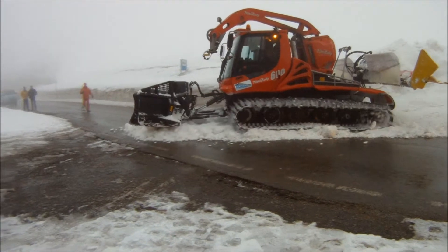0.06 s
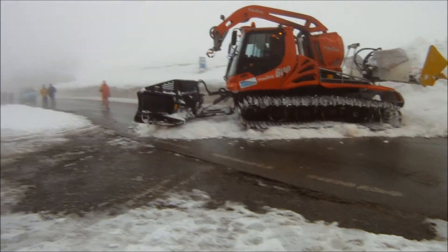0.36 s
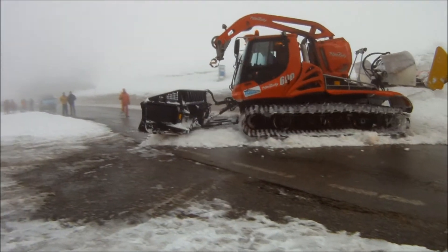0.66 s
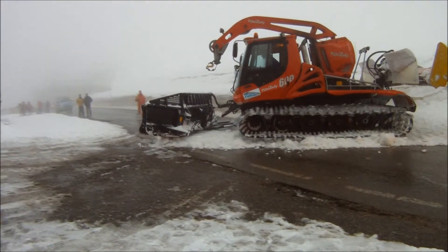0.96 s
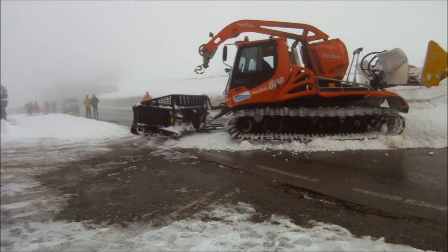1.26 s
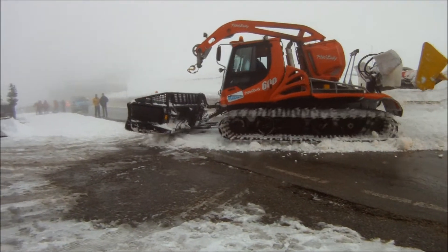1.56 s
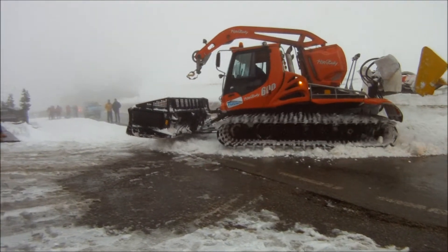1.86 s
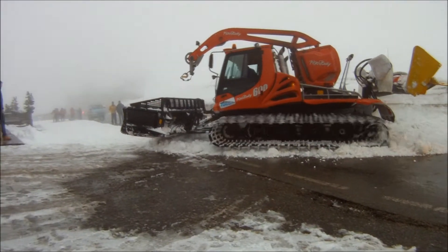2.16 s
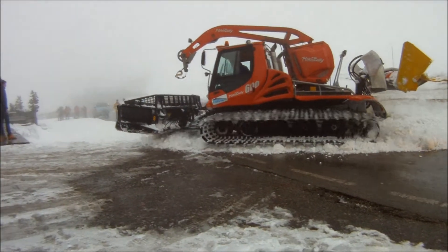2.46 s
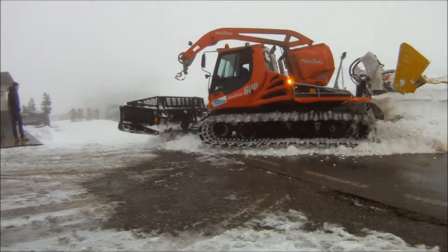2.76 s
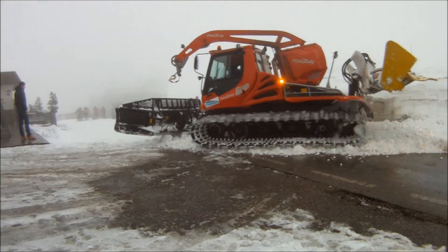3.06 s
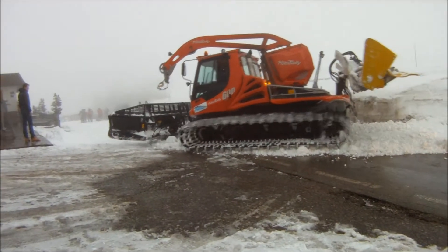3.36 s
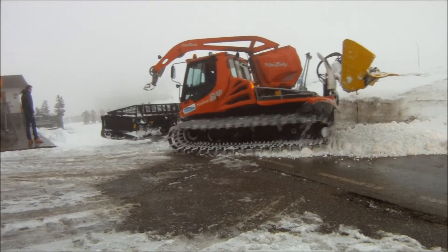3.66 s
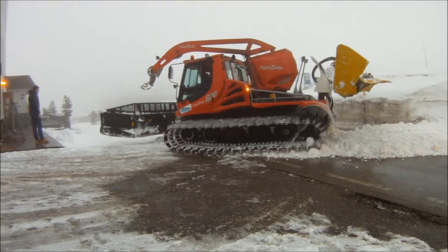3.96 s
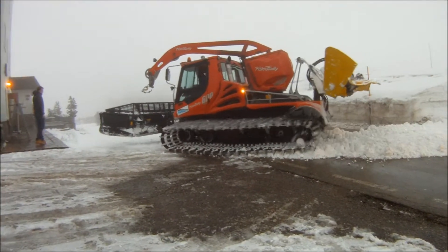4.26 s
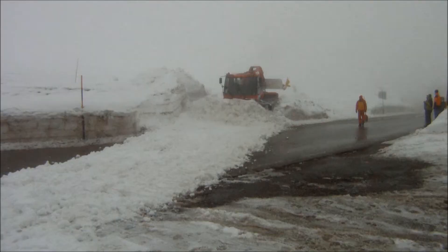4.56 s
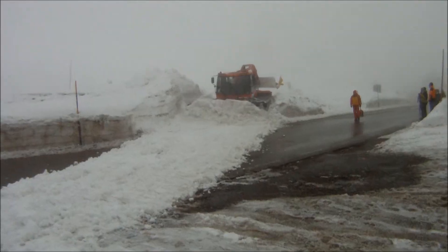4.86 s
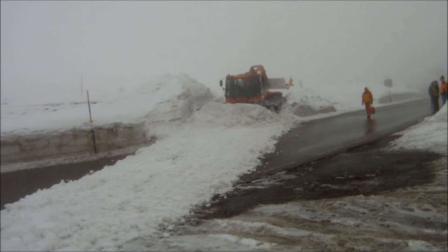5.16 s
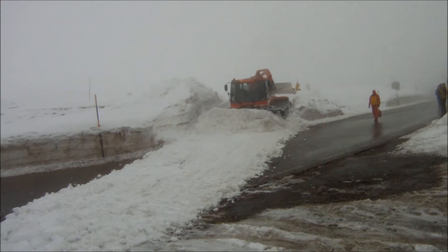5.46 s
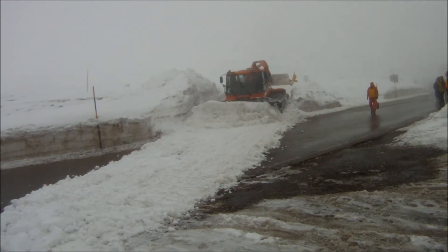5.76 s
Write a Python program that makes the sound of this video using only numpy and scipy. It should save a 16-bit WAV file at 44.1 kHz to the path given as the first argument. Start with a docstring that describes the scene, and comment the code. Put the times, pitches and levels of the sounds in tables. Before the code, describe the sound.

From the start, a tracked snow groomer runs close by, its diesel engine droning and knocking, with clattering panels and an early loose buzz. The tracks crunch steadily through snow, with soft low thumps and a few short, gritty ice cracks. A hydraulic pump whines in swells, most strongly around 1.3 seconds, again near 2.2 and 3.5. The knocking is strongest around 2 seconds, and the tracks rumble harder near 3.5. At about 3.7 seconds the engine throttles back and drops in pitch. At 4.5 seconds the sound breaks off abruptly and resumes as a distant engine wash with a faint drone. Wind bumps the microphone with low thuds until nearly 6 seconds. Between 4.9 and 5.4 seconds, five sharp, dry finger taps clack on the microphone's casing, far louder than everything else. The sound is mono, with a glassy treble.

```python
"""On a wet road, a tracked snow groomer crawls past close to the microphone: its six-cylinder diesel
drones and knocks, a hydraulic pump whines, the tracks thump and crunch through snow. It throttles back
and, after a sudden break, is heard from far up the road, while wind bumps the microphone and five sharp
taps hit the camera body. The small camera takes mono at a low sample rate, adding a glassy treble."""
import sys
import numpy as np
from scipy import signal
from scipy.fft import rfft, irfft
from scipy.io import wavfile

SR = 44100
rng = np.random.default_rng(int(sys.argv[2]) if len(sys.argv) > 2 else 0)


def log_audio(samples):
    """Write samples as a 16-bit WAV file to the path given in sys.argv[1]."""
    # one column per channel
    frames = np.atleast_2d(samples).T
    # limit to full scale, then quantise
    limited = np.clip(frames, -1, 1)
    pcm = np.round(limited * 32767).astype(np.int16)
    wavfile.write(sys.argv[1], SR, pcm)


N = 260190
TIME = np.arange(N) / SR
BREAK_S, RESUME_S = 4.546, 4.561   # the close pass ends; the far machine comes in fully


def groomer_near(firings):
    """The machine at close range; firings is the running count of cylinder firings."""
    drone = part_gain("drone") * exhaust(firings, waver_db=1, overtone_waver_db=2)
    return drone + knock(firings) + panels(firings) + tracks() + pump(firings) + fan(firings)

# exhaust orders: multiple of the firing rate, level/dB
EXHAUST_ORDERS = [(1 / 2, -15), (1, 0), (3 / 2, -17), (2, -16.5), (3, -22), (4, -19)]
def exhaust(firings, waver_db, overtone_waver_db):
    """Exhaust pulses drone in low engine orders, strongest at the firing rate."""
    out = 0
    for order, db in EXHAUST_ORDERS:
        waver = drift(3.7) * (waver_db if order == 1 else overtone_waver_db)
        out += from_db(db + waver) * np.sin(2 * np.pi * (order * firings + rng.random()))
    return rms_one(out)

# each cylinder's blow: level on the sump/dB, level on the head/dB
CYLINDER_BLOWS = [(-13, -2), (0, 1), (-7, -3), (-13, 1), (-1, -3), (-5, 0)]
# resonances of the sump and of the cylinder head: f/Hz, width/Hz, level/dB
SUMP_MODES = [(1003, 48, 0), (1075, 70, -14)]
HEAD_MODES = [(2000, 33, 1), (2035, 92, 12), (1970, 65, -36)]
def knock(firings):
    """Combustion rings the sump and the head; valves close between firings and keep the head ringing."""
    on_sump, on_head = np.transpose(CYLINDER_BLOWS)
    sump_blows = blows(firings, on_sump, decay=2, uneven_db=.8, rattle=.35)
    head_blows = blows(firings, on_head, decay=1.2, uneven_db=.8, rattle=.8)
    valves = from_db(-5) * blows(firings + .4, on_head, decay=1.2, uneven_db=.8, rattle=.5)
    sump = resonate(band(sump_blows, 935, 1056), SUMP_MODES)
    head = resonate(band(head_blows + valves, 1853, 2213), HEAD_MODES)
    in_view = from_db(ramp(1.85, .1, 4.25))   # the sump comes out from behind the track
    return part_gain("sump") * in_view * sump + part_gain("head") * head

def blows(firings, cylinder_db, decay, uneven_db, rattle):
    """Each firing is a blow and a dying rattle; every cylinder has its own strength."""
    count = firings.astype(int)
    strength = from_db(cylinder_db[count % len(cylinder_db)] + uneven_db * rng.standard_normal(N)[count])
    blow = rms_one(1. * (np.diff(count, prepend=0) > 0))
    burst = rms_one(np.exp(-decay * (firings % 1)) * rng.standard_normal(N))
    return strength * (blow + rattle * burst)

# resonances of the bodywork and of one loose panel: f/Hz, width/Hz, level/dB
PANEL_MODES = [(1160, 220, -1.5), (1452, 93, 1), (1790, 130, 1.5), (2226, 200, 2.5), (2453, 73, 4.5),
               (3296, 75, 3), (3597, 276, 4), (4290, 180, -3), (4960, 250, -4.5)]
LOOSE_PANEL_MODES = [(1237, 53, 0)]
def panels(firings):
    """The engine shakes the panels into a clatter; a loose one buzzes early in the pass."""
    on_head = np.transpose(CYLINDER_BLOWS)[1]
    shaking = blows(firings, .5 * on_head, decay=.62, uneven_db=1.95, rattle=25)
    clatter = part_gain("clatter") * resonate(band(shaking, 1240, 5340), PANEL_MODES)
    buzz = part_gain("buzz") * resonate(band(shaking, 1080, 1470), LOOSE_PANEL_MODES)
    return clatter + buzz

def engine_speed():
    """Firings per second: cruising, one lug, a run-down, then steady far up the road."""
    cruise_hz, throttled_hz, far_hz = 59.6, 51, 61
    lug = swell(2.08, .48, 2.2)   # heavy snow
    run_down = ramp(3.76, .47, cruise_hz - throttled_hz)   # the driver lifts off
    return np.where(TIME < BREAK_S, cruise_hz - lug - run_down, far_hz)

# throttle shut, blipped, shut, then eased open: t/s, effort/dB
ENGINE_EFFORT = [(3.68, -1), (3.81, -11.5), (3.88, -4.5), (3.98, -11), (4.2, -7.5), (4.4, -2.5)]
# each part from the roadside: base level/dB, share of the effort, swell t/s, half length/s, swell/dB
PASS_BY = { "drone": (-47.3, 1.1, 1.47, 0.8, -3), "sump": (-60, 1.2, 2, 0.43, 4.5),
           "head": (-57.5, 0.86, 1.84, 2.1, 11.2), "clatter": (-56, 0.26, 3, 1, 2),
           "buzz": (-66.5, 1.2, 0.2, 1.4, 10), "crunch": (-52, 0.5, 3, 1.4, 1.5),
           "rumble": (-58.5, 0.04, 2.5, 0.47, 4), "fan": (-66, 1.3, 0.95, 0.5, 6), }
def part_gain(name):
    """A part follows the throttle, and swells or is screened once as it passes the microphone."""
    db, share, s, half_length_s, swell_db = PASS_BY[name]
    effort_db = np.interp(TIME, *np.transpose(ENGINE_EFFORT))
    return from_db(db + share * effort_db + swell(s, half_length_s, swell_db))

# spectra of crunching snow and of track rumble, close by: f/Hz, level/dB
CRUNCH_SPECTRUM = [(200, -11.5), (300, -5), (420, -6), (620, -0.5), (760, -2), (900, 3.5), (1300, -0.5),
                   (1580, -8), (1800, 6.5), (2600, 1.5), (3000, -7), (3700, 1), (4700, -17), (5450, -1),
                   (5950, -46)]
RUMBLE_SPECTRUM = [(15, 4.5), (40, -6.5), (80, 2), (130, 3), (220, 0), (320, -9.5), (500, -9.5)]
def tracks():
    """The tracks crunch through snow and rumble, louder over a patch of rough ground."""
    crunch = part_gain("crunch") * from_db(1.2 * drift(38)) * noise(CRUNCH_SPECTRUM)
    rough_ground_db = swell(3.51, .15, 8.9)
    rumble = part_gain("rumble") * from_db(rough_ground_db + .5 * drift(14)) * noise(RUMBLE_SPECTRUM)
    return crunch + rumble

# strokes of the blade: t/s, half length/s, level above idle/dB
PUMP_STROKES = [(.22, 0.068, 9.5), (.56, 0.11, 7), (1.25, 0.47, 13), (2.152, 0.41, 10), (3.546, 0.17, 10)]
def pump(firings, idle_db=-73.5, cycles_per_firing=8.48):
    """The hydraulic pump, geared to the engine, whines louder each time the blade is worked."""
    load_db = sum(swell(*stroke) for stroke in PUMP_STROKES)
    return from_db(idle_db + load_db) * shaft_tone(cycles_per_firing * firings, waver_db=1.5)

def fan(firings, cycles_per_firing=4.25):
    """The fan, geared to the engine, hums."""
    return part_gain("fan") * shaft_tone(cycles_per_firing * firings, waver_db=3.5)

def shaft_tone(cycles, waver_db):
    """A shaft-driven tone that flutters a little in phase and level."""
    return rms_one(np.sin(2 * np.pi * cycles + .15 * drift(20)) * from_db(waver_db * drift(6.5)))

# ice cracking near the microphone: t/s, level/dB
ICE_CRACKS = [(.597, -48), (1.376, -48), (1.504, -49), (3.65, -43)]
def cleats(t60=.12, grain_db=2.5):
    """Ice breaks under a track cleat in a short gritty burst."""
    envelope, t = np.zeros(N), TIME[:SR // 4]
    for s, db in ICE_CRACKS:
        add(envelope, s, from_db(db - 60 * t / t60))
    grit = band(rng.standard_normal(N), 700, 4300) * from_db(grain_db * drift(300))
    return envelope * resonate(grit, [(1700, 900, -3), (3600, 600, 0), (4400, 500, -6)])

# spectrum of the machine from far up the road: f/Hz, level/dB
FAR_SPECTRUM = [(20, 19), (45, 25), (70, 18), (110, 8.5), (170, 4.5), (300, 1.5), (700, -5), (1100, -1),
                (1450, -6), (1850, 1.5), (2400, -5), (3100, -9.5), (5300, -11.5), (6000, -21)]
def groomer_far(firings, level_db=-52):
    """At a distance the knock blurs into a wash, with a faint drone and a thin turbo hiss."""
    wash = noise(FAR_SPECTRUM)
    drone = from_db(-5) * exhaust(firings, waver_db=5, overtone_waver_db=3.5)
    turbo = from_db(-20 + 1.5 * drift(18)) * resonate(rng.standard_normal(N), [(3430, 220, 0)])
    return from_db(level_db) * (wash + drone + turbo)

# taps on the camera, right at the microphone:
# t/s, clack peak/dB, contact brightness/Hz, pitch factor, ring relative to clack/dB, jolt f/Hz
CAMERA_TAPS = [(4.8877, -15.5, 2200, 0.99, -11.5, 50), (4.89, -24, 600, 0.83, -17, 50),
               (5.0563, -5, 2160, 0.95, -51, 178), (5.0929, -1, 4950, 1.002, -38, 121),
               (5.1842, -1, 4970, 0.967, -23.5, 80), (5.222, -45, 1990, 0.85, -24, 80),
               (5.311, -41.5, 1200, 0.69, -10, 80), (5.3401, -2, 6000, 1.004, -23.5, 107)]
def taps(ring_hz=960, ring_t60=.029, grit_t60=.018, jolt_db=-31.5, jolt_lead_s=.0018):
    """A finger's gritty push gives a dry clack, a hollow ring and a dull thud through the grip."""
    out, t = np.zeros(N), TIME[:SR // 15]
    for s, db, contact_hz, pitch, ring_db, jolt_hz in CAMERA_TAPS:
        push = 2 * np.pi * contact_hz / SR * np.exp(-2 * np.pi * contact_hz * t)
        grit = from_db(-29.5 - 60 * t / grit_t60) * rng.standard_normal(len(t))
        clack = camera_body(push + grit, pitch)
        ring = from_db(ring_db - 60 * t / ring_t60) * np.sin(2 * np.pi * ring_hz * pitch * t)
        thud = from_db(7.5) * band(push, 58, 356) + from_db(-5) * band(push, 667, 1000)
        add(out, s, -from_db(db) * (clack / np.max(np.abs(clack)) + ring + thud))
        # the finger jolts the camera in the hand just before the clack
        add(out, s - jolt_lead_s, from_db(db + jolt_db) * wobble(jolt_hz))
    return out

# peaks and dips of the case around the microphone: f/Hz, width/Hz, gain/dB
CASE_RESPONSE = [(1180, 104, -21), (1760, 187, 4.5), (2410, 297, 8), (2635, 256, -21), (3260, 656, 16),
                 (3740, 244, -12.5), (3950, 598, 12.5), (4970, 604, 10.5)]
def camera_body(force, pitch):
    """The case passes a broad band, shaped by a chain of peaks and dips; pitch scales them all."""
    x = band(force, 1248 * pitch, 2065 * pitch, order=2)
    for hz, width, db in CASE_RESPONSE:
        w, gain = 2 * np.pi * hz * pitch / SR, from_db(db / 2)
        damp = np.sin(w) * width / (2 * hz)
        forward = [1 + damp * gain, -2 * np.cos(w), 1 - damp * gain]
        feedback = [1 + damp / gain, -2 * np.cos(w), 1 - damp / gain]
        x = signal.lfilter(forward, feedback, x)
    return x

def scuff(s=4.582, rise_s=.0081, db=-48.5):
    """A finger shifts on the case: a quick catch of skin, then a fading slide."""
    age = np.maximum(TIME - s, 0) / rise_s
    rub = rms_one(camera_body(rng.standard_normal(N), pitch=.95))
    return from_db(db) * age * np.exp(1 - age) * rub

# spectrum of eddies at the microphone: f/Hz, level/dB
EDDY_SPECTRUM = [(20, -2), (50, 0.5), (120, -4), (200, -13.5), (350, -26)]
# close track thumps, then after the break wind buffets on the microphone: t/s, level/dB, f/Hz
LOW_BUMPS = [(.215, -41, 130), (.304, -41, 107), (.463, -38, 111), (1.085, -38.5, 190), (1.115, -42, 131),
             (1.389, -42, 152), (2.235, -41.5, 140), (4.094, -41.5, 130), (4.415, -39, 105),
             (4.598, -30.5, 43.8), (4.717, -39, 69.5), (5.035, -33, 53), (5.271, -35.5, 65),
             (5.626, -38.5, 50)]
def gust_and_low_bumps():
    """One gust, plus low bumps: track thumps during the close pass, wind buffets after the break."""
    eddies = rms_one(from_db(4 * drift(14)) * noise(EDDY_SPECTRUM))
    out = swell(4.82, .42, from_db(-49)) * eddies
    for s, db, hz in LOW_BUMPS:
        add(out, s, from_db(db) * wobble(hz))
    return out

def wobble(hz, rise_cycles=.65):
    """A low push that swells and dies in about two cycles."""
    t = TIME[:SR // 5]
    age = t * hz / rise_cycles
    return (age * np.exp(1 - age)) ** 2 * -np.sin(2 * np.pi * hz * t)

def from_db(db):
    """Decibels to gain."""
    return 10 ** (np.asarray(db) / 20)

def rms_one(x):
    """Scale to rms 1."""
    return x / np.sqrt(np.mean(x ** 2) + 1e-20)

def band(x, low_hz, high_hz, order=3):
    """Butterworth band-pass."""
    return signal.sosfilt(signal.butter(order, [low_hz, high_hz], "band", fs=SR, output="sos"), x)

def resonate(x, modes):
    """Parallel resonances (f/Hz, width/Hz, level/dB); rms 1."""
    out = 0
    for hz, width, db in modes:
        r = np.exp(-np.pi * width / SR)
        feedback = [1, -2 * r * np.cos(2 * np.pi * hz / SR), r * r]
        out += from_db(db) * (1 - r * r) * signal.lfilter([1, 0, -1], feedback, x)
    return rms_one(out)

def noise(spectrum):
    """Noise with the given spectrum, cut off above its last point; rms 1."""
    hz, db = np.transpose(spectrum)
    bin_hz = np.arange(N // 2 + 1) * SR / N
    gain = from_db(np.interp(np.log(bin_hz + 1), np.log(hz), db, right=-120))
    return rms_one(irfft(rfft(rng.standard_normal(N)) * gain, N))

def drift(rate_hz):
    """Slow random wander with spread 1."""
    step, settle = 40, 2000
    r = np.exp(-2 * np.pi * rate_hz * step / SR)
    slow = signal.lfilter([1], [1, -2 * r, r * r], rng.standard_normal(N // step + settle + 2))[settle:]
    return np.interp(np.arange(N) / step, np.arange(len(slow)), rms_one(slow))

def swell(s, half_length_s, height):
    """A smooth rise and fall around time s."""
    return height * np.exp(-((TIME - s) / half_length_s) ** 2)

def ramp(s, length_s, height):
    """A straight rise from time s that then holds."""
    return height * np.clip((TIME - s) / length_s, 0, 1)

def add(out, s, sound):
    """Mix a short sound in at time s."""
    start = int(round(s * SR))
    out[start:start + len(sound)] += sound[:N - start]

def scene():
    """The close pass, a brief dip, then the far machine, all on one microphone."""
    firings = np.cumsum(engine_speed() * (1 + .0025 * drift(20))) / SR
    near = np.clip((BREAK_S - TIME) / .0011, 0, 1)
    resumed = np.clip((TIME - RESUME_S) / .001, 0, 1)
    far = np.maximum(resumed, .35 * (1 - near))   # faint during the break
    machine = near * groomer_near(firings) + far * groomer_far(firings)
    mono = machine + cleats() + gust_and_low_bumps() + taps() + scuff()
    return np.array([mono, mono])

def record(dry):
    """The camera rounds peaks and holds 12 kHz samples as steps, mirroring the sound into the treble."""
    rounded = .9 * np.tanh(dry / .9)
    slow = signal.resample_poly(rounded, 40, 147, axis=1)
    held = signal.resample_poly(np.repeat(slow, 4, axis=1), 147, 160, axis=1)[:, :N]
    return signal.sosfilt(signal.ellip(10, .2, 70, 15400, "lowpass", fs=SR, output="sos"), held)


dry = scene()
out = record(dry)
log_audio(out)
```